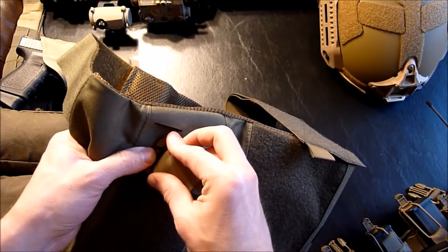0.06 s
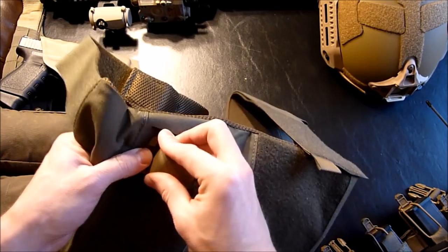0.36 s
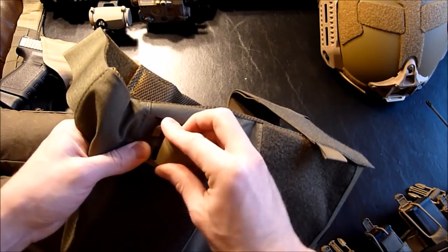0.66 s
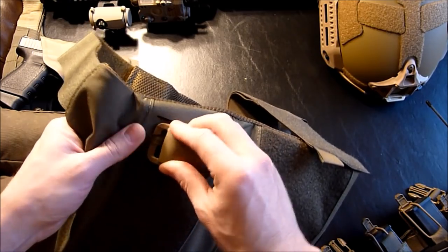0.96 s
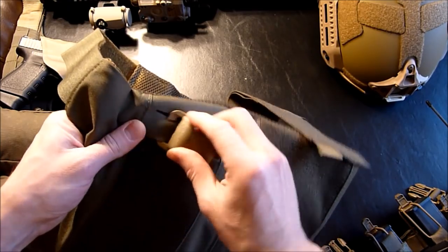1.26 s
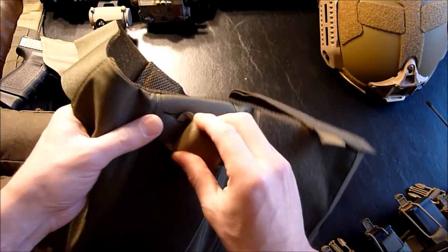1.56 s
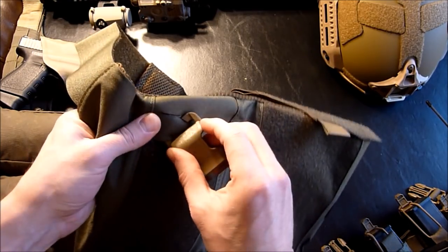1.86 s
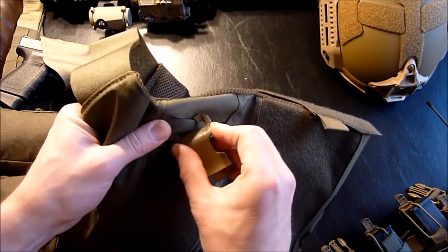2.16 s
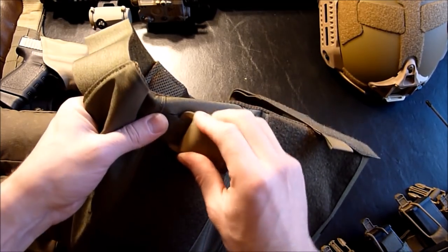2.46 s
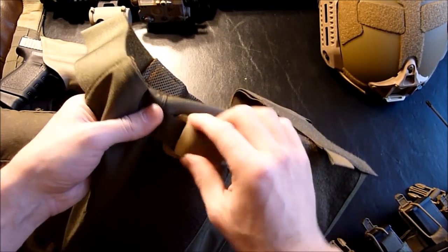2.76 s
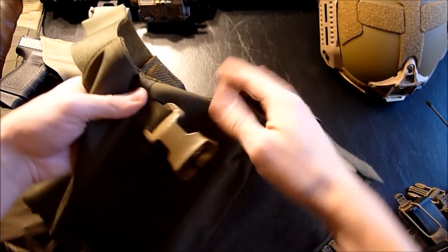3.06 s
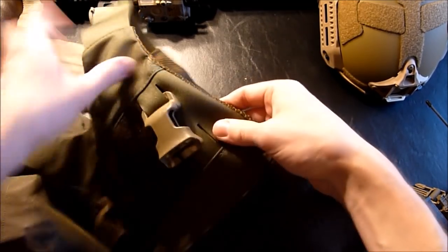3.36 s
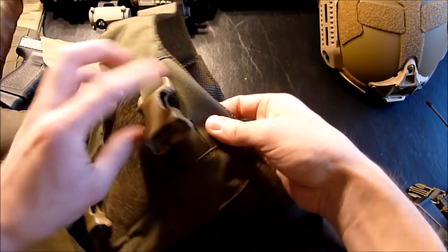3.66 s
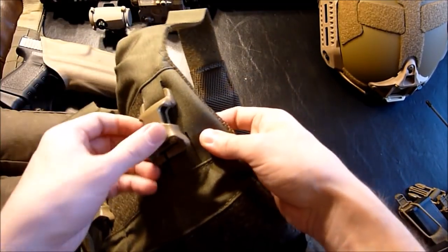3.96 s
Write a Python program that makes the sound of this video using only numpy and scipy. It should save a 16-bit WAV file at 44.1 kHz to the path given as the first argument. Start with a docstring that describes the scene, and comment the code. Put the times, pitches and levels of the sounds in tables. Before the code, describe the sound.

Stiff nylon rustles in short strokes as hands work a padded vest, close up in a small quiet room. A plastic buckle clicks, snaps shut, then knocks against the padding with soft thuds as the vest is turned.

```python
"""Handling a padded nylon vest

Hands work the vest on a table, close up, in a small quiet room. Stiff cloth rubs in short strokes as
its threads slip over each other, and creases pop as folds give way. A plastic buckle catches, snaps
home and knocks about on the padding as the vest is turned over."""
import sys
import numpy as np
from scipy import signal
from scipy.fft import rfft, irfft, next_fast_len
from scipy.io import wavfile
from scipy.ndimage import uniform_filter1d, map_coordinates

SR = 44100
rng = np.random.default_rng(int(sys.argv[2]) if len(sys.argv) > 2 else 0)


def put_to_file(sound):
    """Save the sound as 16-bit audio at rate SR, in the file named by the first command-line argument."""
    columns = np.atleast_2d(sound).T  # one column per channel
    safe = np.clip(columns, -1, 1)
    whole_steps = np.round(safe * 32767)
    wavfile.write(sys.argv[1], SR, whole_steps.astype(np.int16))


N = 176400

# the padding's dull modes: (pitch [Hz], level [dB], t60 [s])
PADDING = [(193, -12.5, 0.041), (343, -2, 0.034), (532, -4.5, 0.024)]


def cloth(stroke_shape=1.65, judder_db=2.1, layer_drift_db=1):
    """Each stroke swells, judders and fades, sounding in the padding, the weave and the fibres."""
    # strokes of cloth on cloth, with the buckle scraping on after its catch at 1.41 s and a zip at 3.30 s:
    # (peak time [s], rise [s], fall [s], rumble [dB], rasp [dB], hiss [dB])
    strokes = [(0.319, 0.03, 0.017, -49.5, -50, -50.5), (.685, 0.052, 0.062, -59.5, -56, -61.5),
               (0.909, 0.042, 0.041, -57, -56, -51.5), (1.094, 0.03, 0.0072, -47.5, -49.5, -50),
               (1.195, 0.0084, 0.015, -54.5, -57, -61), (1.39, 0.055, 0.05, -55, -55, -50),
               (1.41, .004, .025, -53, -48.5, -46), (1.54, 0.049, 0.12, -53.5, -56.5, -58),
               (1.68, 0.011, 0.018, -49, -48.5, -51), (1.748, 0.023, 0.016, -47, -44.5, -54),
               (1.81, .02, 0.023, -61, -56.5, -57), (2.148, 0.022, 0.026, -55, -54.5, -51.5),
               (2.32, 0.034, 0.035, -51.5, -55, -59), (2.402, 0.014, 0.016, -49, -52.5, -51),
               (2.675, 0.04, 0.031, -53, -56, -55.5), (2.83, 0.053, 0.025, -51.5, -58.5, -60),
               (3.23, 0.047, .04, -55, -55.5, -56.5), (3.301, 0.017, 0.02, -55, -45.5, -34.5),
               (3.38, 0.02, 0.031, -51, -54.5, -52.5), (3.494, 0.023, 0.026, -51.5, -54, -53.5),
               (3.59, 0.065, 0.11, -56, -57, -60.5), (3.77, 0.035, 0.058, -47, -52.5, -54.5),
               (3.857, 0.025, 0.029, -52, -55.5, -64), (3.95, 0.026, 0.071, -53, -57.5, -55)]
    # colours of padding rumble, weave rasp and fibre hiss: (frequency [Hz], level [dB])
    rumble = [(30, -40), (100, -16.5), (160, -6), (260, -2.5), (380, 1.5), (520, -3), (680, -15.5),
              (1100, -9), (1700, -21.5), (4000, -31)]
    rasp = [(300, -34), (800, 3.5), (1200, 2.5), (1800, -2.5), (3500, 1), (6000, -4), (9000, -11),
            (16000, -17)]
    hiss = [(1500, -13.5), (4400, -7), (5500, 1.5), (8000, 1.5), (12500, 1), (15500, -2)]
    t, powers = np.arange(N) / SR, np.zeros((3, N))
    for s, rise, fall, *levels in strokes:
        from_peak = np.abs(t - s) / np.where(t < s, rise, fall)
        swell = np.exp(-from_peak ** stroke_shape)  # shape 1 is pointed, 2 is a bell
        powers += amp(levels)[:, None] ** 2 * swell
    grip = amp(judder_db * wobble(rate=110))
    return grip * sum(np.sqrt(power) * amp(layer_drift_db * wobble(rate=45)) * friction(colour)
                      for power, colour in zip(powers, (rumble, rasp, hiss)))


def friction(spectrum, slips_per_s=2800, spread_db=3.7, slip_share=0.58):
    """Threads slip over each other in tiny uneven grains, over a smooth rub."""
    sizes = amp(spread_db * np.minimum(rng.exponential(size=N), 4))
    slips = (rng.random(N) < slips_per_s / SR) * sizes * rng.choice([-1, 1], N)
    rub = np.sqrt(slip_share) * unit(slips) + np.sqrt(1 - slip_share) * rng.standard_normal(N)
    return coloured(shifting_folds(rub), spectrum)


def shifting_folds(x, depth_db=2.5):
    """The colour drifts in patches as the folds change shape."""
    bands = signal.stft(x, nperseg=256)[2]
    patches = uniform_filter1d(rng.standard_normal(bands.shape), size=5, axis=0)
    patches = uniform_filter1d(patches, size=22, axis=1)
    return signal.istft(bands * amp(depth_db * unit(patches)), nperseg=256)[1][:N]


def creases(ring_cycles=16, crack_db=-3.5):
    """Stiff folds give way, each with a crack and a brief ring; small folds crack thinner."""
    # creases popping: (time [s], level [dB], pitch [Hz])
    pops = [(0.129, -39.5, 2700), (.262, -41, 2140), (.472, -47, 2970), (1.668, -37, 5000),
            (1.7927, -28.5, 11400), (1.8178, -29, 6060), (1.86, -37, 13000), (2.243, -33.5, 14000),
            (2.3018, -30.5, 4540), (2.337, -35.5, 4000), (2.6837, -39, 6000), (3.565, -42, 2970),
            (3.593, -36.5, 3020), (3.728, -31.5, 3450), (3.919, -35, 13100)]
    out = np.zeros(N)
    for s, db, hz in pops:
        pop = butter_filter(crack(t60=0.0066), 1, hz / 2, "high")
        ping = ring([(hz, 0, ring_cycles / hz)])
        add(out, s, amp(db) * (ping + amp(crack_db) * pop))
    return out


def buckle(catch_s=1.4054, catch_db=-19, snap_s=2.4839, snap_db=-18):
    """A prong catches with a thin click; later the buckle snaps home with a short bright tail."""
    # the buckle's modes: (pitch [Hz], level [dB], t60 [s])
    modes = [(402, -4, 0.019), (1130, -5, .015)]
    # colours of the catch and the snap: (frequency [Hz], level [dB])
    catch_colour = [(400, 5), (800, -3.5), (8000, -2.5), (8800, 6.5), (16000, -4)]
    snap_colour = [(700, -22), (2100, -2), (2650, -8), (3500, 1.5), (7600, 4), (9200, -5), (16000, -6)]
    body, catch, snap, snap_tail = np.zeros((4, N))
    add(catch, catch_s, amp(catch_db) * crack(t60=0.0059))
    add(body, snap_s, amp(snap_db) * ring(modes))
    add(snap, snap_s, amp(snap_db + 3) * crack(t60=0.016))
    add(snap_tail, snap_s, amp(snap_db - 20) * crack(t60=0.1))
    clicks = equalised(catch, catch_colour) + equalised(snap, snap_colour)
    snap_tail = butter_filter(snap_tail, 2, (3270, 7000), "band")
    return butter_filter(body + clicks + snap_tail, 2, 202, "high")  # the buckle carries no deep bass


def knocks(scuff_hz=(1200, 5800), scuff_rise_s=0.0012, sink_s=0.0011):
    """The buckle's shell clacks, scuffs and sinks into the padding with a thud."""
    # the buckle landing on the vest: (time [s], thud [dB], clack [dB], scuff [dB])
    hits = [(.642, -41.5, -34.5, -39), (1.091, -41, -32.5, -41), (1.87, -31, -29, -42),
            (1.879, -55, -31.5, -42), (2.951, -32.5, -44, -29), (2.959, -57, -46, -27),
            (3.707, -32, -37.5, -39), (3.727, -40, -35.5, -32.5)]
    # the plastic shell's modes: (pitch [Hz], level [dB], t60 [s])
    shell = [(850, -10, 0.015), (1210, -1, 0.014), (1630, -9.5, 0.0094), (2290, -10.5, 0.0075)]
    out, scuffs = np.zeros((2, N))
    for s, thud_db, clack_db, scuff_db in hits:
        add(out, s, amp(clack_db) * ring(shell))
        add(out, s + sink_s, amp(thud_db) * ring(PADDING))
        scuff = crack(t60=0.051)
        attack = 1 - np.exp(-np.arange(len(scuff)) / SR / scuff_rise_s)
        add(scuffs, s, amp(scuff_db) * scuff * attack)
    return out + butter_filter(scuffs, 1, scuff_hz, "band")


def bumps():
    """Soft thuds of the padded vest, and one deep bump of the table."""
    # soft thuds: (time [s], level [dB], pitch [ratio to the padding's modes])
    thuds = [(.318, -37, 1.03), (2.146, -40, 0.72), (3.135, -35, 0.14), (3.331, -35, 1.3),
             (3.362, -32, 0.56), (3.415, -29, 1), (3.729, -36, 0.45), (3.816, -36, 1.12),
             (3.839, -29.5, 1.33), (3.872, -37, 0.73)]
    out = np.zeros(N)
    for s, db, ratio in thuds:
        add(out, s, amp(db) * ring(PADDING, ratio))
    return out


def room(x, tail_db=-3.5, early_db=-12.5, early_span_s=0.0079, predelay_s=0.003, wide_hz=500):
    """First reflections off the table and walls, and a short tail; both widen above the bass."""
    # the tail's decay: (frequency [Hz], t60 [s])
    decay = [(320, 0.45), (600, 0.28), (3500, 0.3), (12000, 0.2)]
    # the reverb's colour: (frequency [Hz], level [dB])
    colour = [(100, -11), (300, -5.5), (750, -3.5), (2000, 2), (5500, 0.5), (7500, -2), (14000, -2)]
    hz, t, bands = signal.stft(rng.standard_normal((2, SR // 2)), SR, nperseg=256)
    fade = 10 ** (-3 * t / along(decay, hz)[:, None])
    tail = signal.istft(bands * fade, SR, nperseg=256)[1]
    early = rng.standard_normal(tail.shape) * (np.arange(tail.shape[1]) < early_span_s * SR)
    impulse = amp(tail_db) * tail / np.linalg.norm(tail) + amp(early_db) * early / np.linalg.norm(early)
    delayed = np.pad(x, (round(predelay_s * SR), 0))
    wet = signal.fftconvolve(delayed[None], impulse, axes=1)[:, :N]
    mid, side = equalised(wet, colour)
    side = filtered(side, lambda f: f ** 2 / np.hypot(f ** 2, wide_hz ** 2))
    return np.array([mid + side, mid - side])


def room_mode(x, hz=334, t60=0.6, gain_db=-61.5):
    """One low resonance of the room hums on after the handling."""
    t = np.arange(SR) / SR
    hum = amp(gain_db) * 10 ** (-3 * t / t60) * np.sin(2 * np.pi * hz * t)
    return signal.fftconvolve(x, hum)[:N]


def room_tone(level_db=-54.8):
    """A steady bed of still air, nearly mono in the low mids and wide in the treble."""
    # the air's colour: (frequency [Hz], level [dB])
    colour = [(20, -27), (55, -10.5), (90, -12.5), (170, -4.5), (310, -3), (520, -7), (680, -8.5),
              (1150, -13.5), (1800, -16.5), (4000, -17.5), (9000, -21.5), (16000, -28)]
    # its stereo image: (frequency [Hz], left-right correlation [0 to 1])
    correlation = [(50, .15), (130, 0.57), (300, 0.84), (700, 0.1), (12000, 0.13)]
    mid, side = coloured(rng.standard_normal((2, N)), colour)
    mid = filtered(mid, lambda hz: np.sqrt((1 + along(correlation, hz)) / 2))
    side = filtered(side, lambda hz: np.sqrt((1 - along(correlation, hz)) / 2))
    return amp(level_db) * np.array([mid + side, mid - side])


def ring(modes, ratio=1):
    """Damped modes struck together, neighbours in opposite directions."""
    t = np.arange(SR // 5) / SR
    return sum((-1) ** k * amp(db) * dying(t60) * np.sin(2 * np.pi * hz * ratio * t)
               for k, (hz, db, t60) in enumerate(modes))


def crack(t60, passes=3):
    """A dying burst of noise, flattened so that no pitch stands out."""
    fade = dying(t60)
    burst = fade * rng.standard_normal(len(fade))
    for _ in range(passes):
        flat_spectrum = np.exp(1j * np.angle(rfft(burst)))
        burst = fade ** 0.25 * irfft(flat_spectrum, len(fade))
    return burst * np.linalg.norm(fade) / np.linalg.norm(burst)


def dying(t60):
    """A fifth of a second of exponential decay."""
    return 10 ** (-3 * np.arange(SR // 5) / SR / t60)


def wobble(rate):
    """A smooth random curve, rate knots a second."""
    return map_coordinates(rng.standard_normal(4096), [np.arange(N) * rate / SR], mode="wrap")


def add(track, s, sound):
    """Mix a sound into the track at time s."""
    part = track[round(s * SR):][:len(sound)]
    part += sound[:len(part)]


def amp(db):
    """Decibels to gain."""
    return 10 ** (np.asarray(db) / 20)


def unit(x):
    """Scaled to rms 1."""
    return x / np.sqrt(np.mean(x ** 2) + 1e-20)


def along(points, hz):
    """A curve of (frequency [Hz], value) points, read on a log axis."""
    knots_hz, values = np.transpose(points)
    return np.interp(np.log(hz + 1), np.log(knots_hz + 1), values)


def filtered(x, response):
    """x through a frequency response."""
    size = next_fast_len(N + SR // 2)
    return irfft(rfft(x, size) * response(np.fft.rfftfreq(size, 1 / SR)), size)[..., :N]


def butter_filter(x, order, hz, kind):
    """x through a Butterworth filter."""
    return signal.lfilter(*signal.butter(order, hz, kind, fs=SR), x)


def equalised(x, curve):
    """x through an EQ curve of (frequency [Hz], level [dB])."""
    return filtered(x, lambda hz: amp(along(curve, hz)))


def coloured(x, curve):
    """x equalised, at rms 1."""
    return unit(equalised(x, curve))


def scene(left_lead_s=1.3e-5, balance_db=0.2):
    """The handling, a little left of centre, in its room."""
    vest = cloth() + creases() + buckle() + knocks() + bumps()
    sides = np.array([[1], [-1]])
    direct = filtered(vest, lambda hz: np.exp(1j * np.pi * hz * left_lead_s * sides))
    return amp(balance_db * sides) * (direct + room(vest) + room_mode(vest)) + room_tone()


def record(dry):
    """A steep high cut at 15.9 kHz."""
    return filtered(dry, lambda hz: np.clip((15900 - hz) / 400 + 0.5, 0, 1))


dry = scene()
out = record(dry)
put_to_file(out)
```